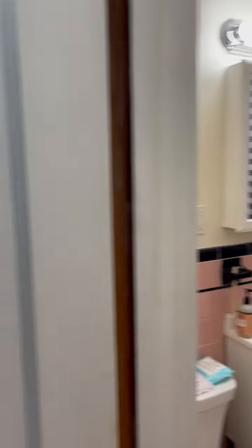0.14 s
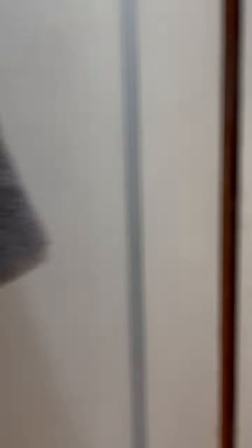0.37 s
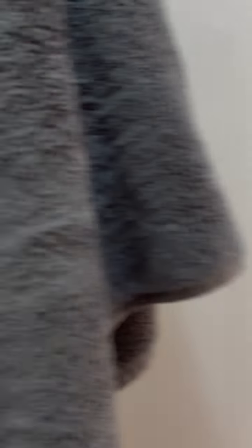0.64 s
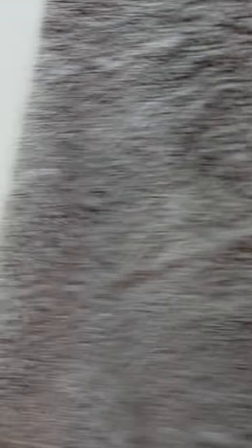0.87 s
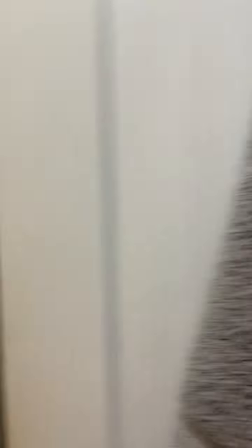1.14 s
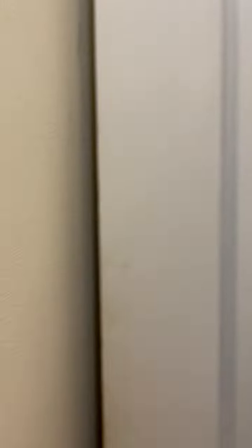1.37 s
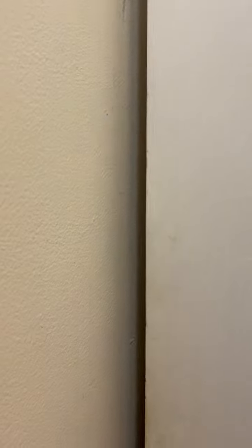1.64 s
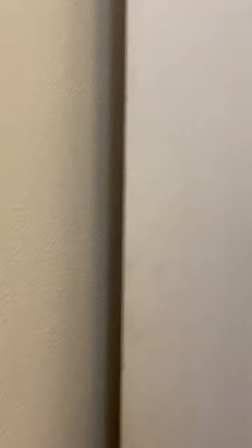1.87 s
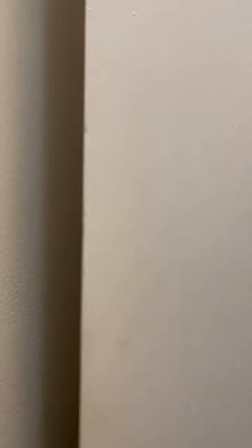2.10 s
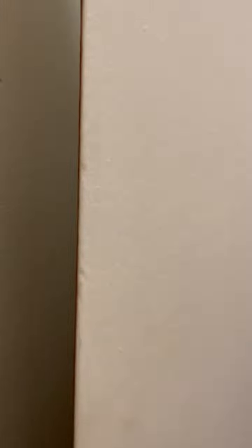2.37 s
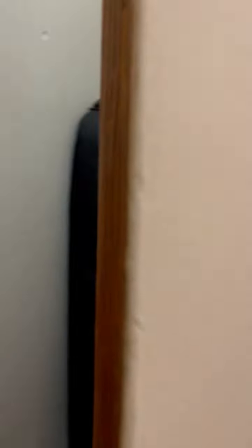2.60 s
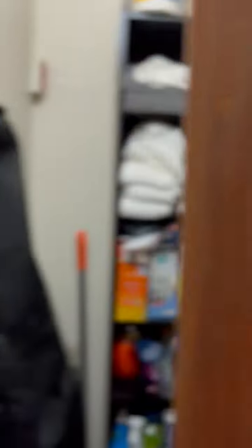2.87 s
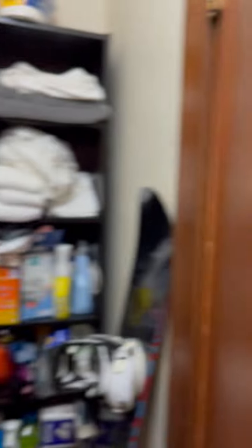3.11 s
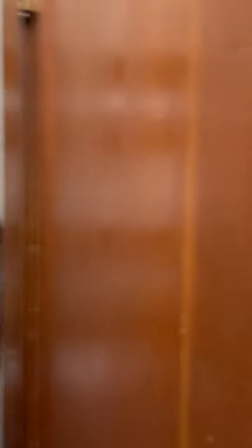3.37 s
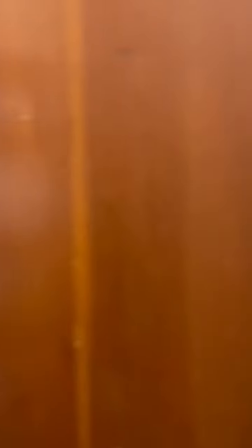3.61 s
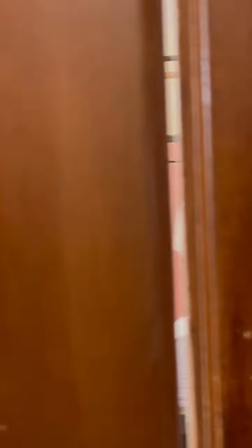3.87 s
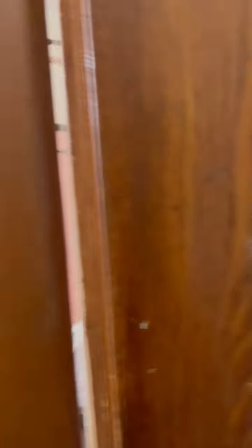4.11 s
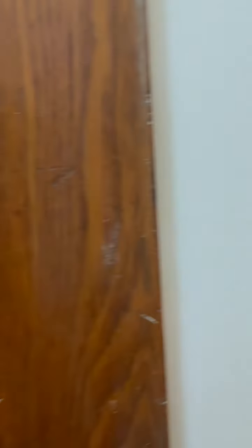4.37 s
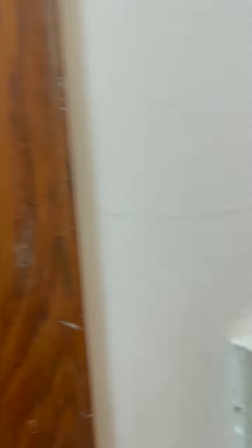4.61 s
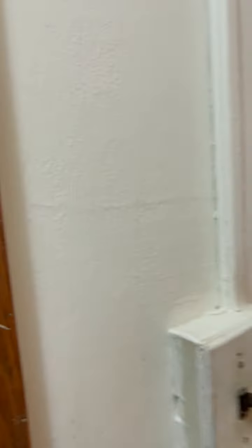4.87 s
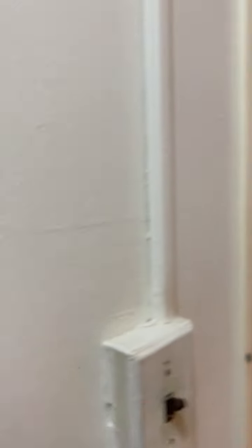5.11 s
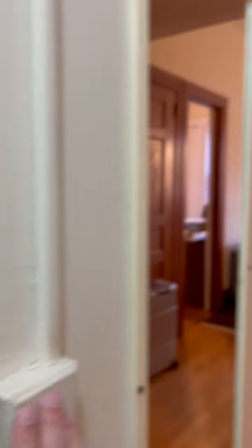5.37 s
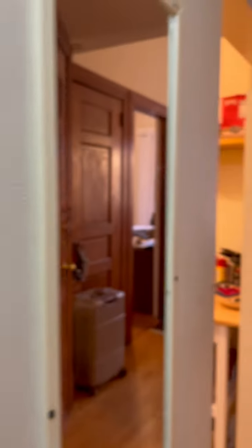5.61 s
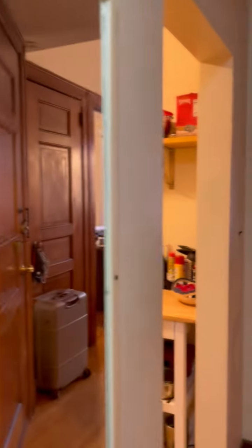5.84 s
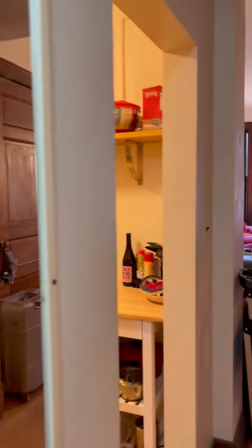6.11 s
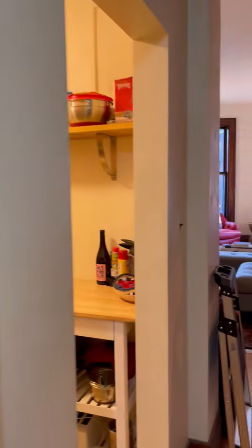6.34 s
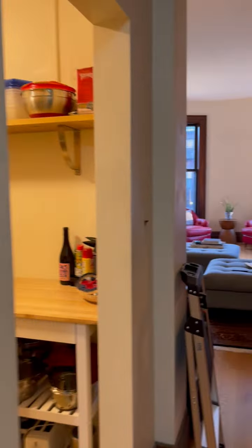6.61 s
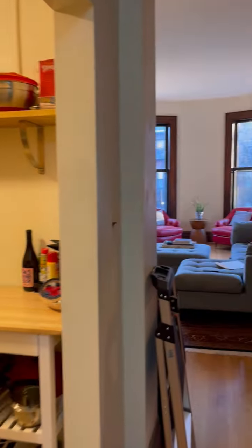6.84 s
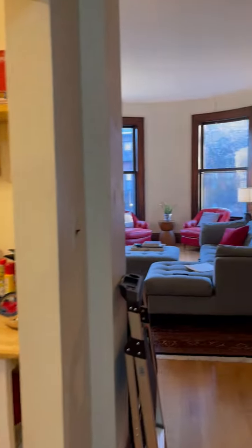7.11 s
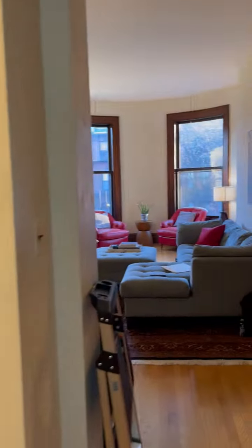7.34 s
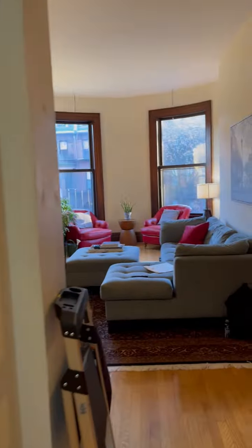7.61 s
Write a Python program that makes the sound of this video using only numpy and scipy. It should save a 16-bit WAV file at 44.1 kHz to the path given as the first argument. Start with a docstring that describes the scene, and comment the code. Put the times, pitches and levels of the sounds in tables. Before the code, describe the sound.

A quiet flat, heard from a handheld stereo microphone moving with the person: faint low hum, soft room air, bright cloth rustle. Muffled floor thumps come around 0.5 s. From 1.3 to 1.8 s a low drag on wood, a sleeve brush and firmer board knocks; another dry woody knock at 3.0 s, soft thuds at 3.4 and 3.8. Around 3.9-4.1 s a sleeve swishes and the handle turns with slight grit. At 4.48 s the steel latch snaps sharply; the wooden leaf thuds at 4.65, and at 4.72 comes the loudest, bright metallic crack with a deep wooden slam. It rebounds, chattering and rattling until about 5.1 s, with a short hallway echo. A small light switch clicks rapidly at 5.6 s. Clothing rustles around 6.0-6.4 s, then calm, with short woody floorboard cracks at 7.2 and 7.6 s.

```python
"""Pulling a wooden door shut

Someone walks through a quiet flat holding a phone: floorboards knock and crack, clothes rustle, a low hum goes on.
The handle turns, the latch strikes its plate, the leaf slams into the frame, rebounds and shudders; a switch clicks.
Struck things are sums of dying tones plus bursts of noise; cloth, air and rumble are coloured, moving noise.
Footsteps, door and switch also echo in a hallway of dying noise.
"""
import sys
import numpy as np
from scipy import signal
from scipy.fft import rfft, irfft, next_fast_len
from scipy.io import wavfile
from scipy.ndimage import uniform_filter1d, map_coordinates

SR = 44100
rng = np.random.default_rng(int(sys.argv[2]) if len(sys.argv) > 2 else 0)


def digitize_waveform(pressure):
    """Quantize a signal to 16-bit integers and store it at the path in sys.argv[1].

    Rows of a 2-D input are taken as channels; values are limited to [-1, 1].
    """
    field = np.atleast_2d(pressure).T
    bounded = np.clip(field, -1, 1)
    quanta = np.round(bounded * 32767).astype(np.int16)
    wavfile.write(sys.argv[1], SR, quanta)


def level_to_linear(level):
    """Convert decibel levels to linear amplitude factors, elementwise."""
    exponent = np.asarray(level, float) / 20
    return 10 ** exponent


N = 340726  # length of the scene in samples

# low sound of moving about: (time [s], floor rumble level [dB], room tone level [dB])
MOVING_LEVELS = [(0, -65, -60), (.58, -53, -62), (1.18, -60, -56), (1.52, -43, -50), (1.72, -36, -54),
                 (1.85, -67, -59), (2.25, -54.5, -52.5), (2.71, -59, -59.5), (3.03, -53, -48.5),
                 (3.27, -57, -62.5), (4.17, -49, -53.5), (4.56, -46.5, -50.5), (4.66, -45, -32),
                 (5.14, -46, -47.5), (5.42, -50, -66), (5.57, -47, -60), (5.88, -53.5, -62.5),
                 (6.7, -56, -63), (6.99, -54.5, -56), (7.32, -57, -63), (7.73, -53, -59)]
# cloth brushing cloth: (time [s], hiss level [dB], body level [dB])
CLOTH_LEVELS = [(0, -53.5, -56), (.6, -56, -57.5), (1.2, -55.5, -59.5), (1.4, -51, -59), (1.57, -42, -63),
                (1.83, -53.5, -60.5), (2.2, -49, -56), (2.4, -49, -60.5), (2.71, -58, -58.5),
                (3.2, -65.5, -65.5), (3.39, -54.5, -66.5), (3.55, -61.5, -65), (3.75, -53, -69),
                (4.0, -46, -57), (4.17, -51.5, -66.5), (4.56, -54.5, -52), (4.75, -49.5, -47),
                (5.1, -56.5, -59), (5.2, -46.5, -61), (5.38, -48.5, -64), (5.57, -61.5, -80),
                (5.88, -56, -58), (6.02, -44, -54), (6.14, -46, -55), (6.25, -46, -57), (6.38, -51.5, -57),
                (6.45, -56.5, -63), (6.71, -58, -65), (6.99, -52.5, -57.5), (7.32, -60, -64.5),
                (7.73, -61.5, -72)]
# colour of the floor rumble: (frequency [Hz], relative level [dB])
RUMBLE_COLOUR = [(15, -25), (30, -8.5), (55, 1.5), (85, -7), (130, -21.5), (250, -52)]
# colour of the cloth's bright hiss: (frequency [Hz], relative level [dB])
CLOTH_HISS_COLOUR = [(2500, -10), (4000, -4), (6500, -3.5), (8500, 0.5), (10500, 5.5), (11500, -1),
                     (12200, -18), (12800, -50.5), (14500, -63)]
# colour of the cloth's fuller body: (frequency [Hz], relative level [dB])
CLOTH_BODY_COLOUR = [(500, -0.5), (1200, -2), (2300, 0.5), (4500, -5.5), (7000, -37), (10000, -35.5),
                     (12000, -84)]
# colour of the still air: (frequency [Hz], relative level [dB])
AIR_COLOUR = [(150, -10), (400, 3.5), (1000, -2.5), (2000, -10.5), (4000, -12.5), (8000, -83)]
# air resonances of the rooms: (frequency [Hz], width [Hz], relative level [dB])
ROOM_MODES = [(110, 19.4, 1.5), (160, 29, -2.5), (205.8, 13, 1), (290, 15, -14), (373, 2.4, -18.5),
              (509, 66, -11.5)]

# steady hum of the building, one entry a tone: (frequency [Hz])
HUM_TONES = [59.4, 113, 210, 285, 319, 386]
# the hum, louder or fainter from spot to spot: (time [s], then the level of each tone [dB])
HUM_LEVELS = [(0, -53.5, -62, -70, -78, -65.5, -74), (.7, -56, -69, -66.5, -85, -67.5, -62),
              (1.2, -54, -61, -70, -80, -78, -80), (2.2, -54.5, -55, -60, -62.5, -80, -70),
              (2.8, -59, -63, -59, -62.5, -71, -68.5), (3.5, -62, -61, -76, -67, -68, -71),
              (4.3, -62.5, -68, -66.5, -67.5, -69, -83.5), (5.6, -61, -56, -72, -79.5, -83, -85.5),
              (6.6, -66, -64, -78, -86, -107, -101), (7.73, -55.5, -69, -73.5, -78, -80, -76)]

# short pings and squeaks: (time [s], level before flutter [dB], frequency [Hz], length [s])
PING_EVENTS = [(0.138, -50, 1080, 0.043), (0.13, -54.5, 710, 0.024), (0.211, -52.5, 880, 0.039),
               (3.61, -54, 883, 0.033), (3.84, -59, 2800, 0.073), (4.038, -52, 2200, 0.052),
               (4.038, -55, 3400, 0.025), (4.04, -54, 3600, .035), (4.479, -19.5, 4900, 0.012),
               (5.595, -61, 1205, 0.013), (5.59, -63, 1675, 0.022), (5.395, -51, 764, 0.021),
               (5.92, -49, 496, 0.038), (7.469, -54, 950, 0.018)]
PING_FLUTTER_DB, PING_SWAY_RAD = 3, .7  # how far level and phase waver

# floorboards under a foot:
# (time [s], thump level [dB], board frequency [Hz], time to fall 60 dB [s], crack over the thump [dB])
STEP_EVENTS = [(.446, -35, 69.5, 0.28, -40), (0.615, -38.5, 62, .2, -40), (1.337, -36, 185.7, 0.22, -6),
               (1.5, -38.5, 193, .2, -7), (1.623, -33.5, 200, 0.11, -5), (1.647, -27.5, 186.6, 0.18, -33),
               (1.655, -28.5, 62, 0.19, -36), (1.792, -34, 49.4, 0.25, -32), (2.627, -46, 127, .2, -7),
               (2.663, -41.5, 124, 0.16, -4), (2.986, -27.5, 207, 0.11, -8.5), (3.021, -43, 200, .12, -4),
               (3.041, -42, 200, 0.089, -15), (3.055, -41.5, 233, 0.11, -4), (3.414, -36, 48, .2, -40),
               (3.772, -31.5, 66.4, .2, -38), (6.438, -45, 68.5, 0.23, -35), (6.753, -38.5, 93, .2, -3),
               (7.205, -40.5, 166, 0.037, 12), (7.209, -27, 163, 0.084, 2.5), (7.231, -25, 165, .06, -10),
               (7.247, -40, 230, .2, -7), (7.465, -51, 116, .2, 3), (7.557, -31, 160, 0.12, -7),
               (7.582, -36.5, 260, .15, -13.5), (7.658, -36, 155, 0.19, -2.5), (7.686, -35, 290, 0.16, -22)]
# colour of a board's crack: (frequency [Hz], relative level [dB])
BOARD_COLOUR = [(100, 21), (200, 28), (600, 7), (1200, 1), (2500, 2), (4000, -32), (7000, -35.5),
                (12000, -39)]
# colour of a knocking wood joint: (frequency [Hz], relative level [dB])
JOINT_COLOUR = [(200, 4), (600, 9.5), (1100, 3), (2500, -13.5), (4000, -16), (7000, -23), (12000, -45),
                (13500, -60)]
# dry woody knocks, perhaps a hand or the door bumping: (time [s], crack level [dB], panel level [dB])
KNOCK_EVENTS = [(1.6155, -39.5, -43), (1.622, -54, -34), (2.983, -53, -37), (2.989, -51, -52),
                (2.996, -52, -60), (3.003, -50, -58), (3.013, -52, -58)]
# colour of a dry knock's crack: (frequency [Hz], relative level [dB])
KNOCK_COLOUR = [(200, -18), (800, -14), (1700, -2), (3000, -5), (4500, -14), (8000, -9), (12500, -40)]
# a thin panel under the dry knocks: (frequency [Hz], relative level [dB], time to fall 60 dB [s])
PANEL_MODES = [(423, -5, 0.037), (610, 3.5, 0.032), (870, -1, 0.047), (1047, -12, .05), (1254, -9, 0.057),
               (1590, -6, 0.037)]

# the hallway's echo: (frequency [Hz], time to fall 60 dB [s])
HALL_DECAY = [(60, 0.41), (300, 0.3), (1500, 0.26), (5000, 0.21), (11000, 0.095)]
# how alike left and right are in spread-out sound: (frequency [Hz], likeness [0 to 1])
SIDE_LIKENESS = [(150, 1), (400, .93), (750, .62), (1400, .85), (1950, .99), (3000, .55), (3900, .3),
                 (4900, .9), (5400, .7), (6100, .995), (7500, .9), (8800, .998), (9400, .998), (10500, .93),
                 (11800, .998), (13000, 1)]

# something drags low on wood: (time [s], length [s], level [dB])
DRAG_EVENTS = [(1.33, 0.16, -45), (1.49, .11, -39.5)]
# what it drags on: (frequency [Hz], width [Hz], relative level [dB])
DRAG_MODES = [(57.7, 14, 6), (181, 22, 5), (274, 26, -20), (430, 80, -23)]
# brief brushes of a sleeve: (time [s], length [s], level [dB])
SLEEVE_EVENTS = [(1.37, 0.3, -43.5), (3.95, .05, -46.5), (4.02, 0.11, -45.5), (5.465, 0.085, -49.5),
                 (7.392, 0.1, -46.5)]
# turns of the handle: (time [s], length [s], level [dB])
HANDLE_EVENTS = [(3.87, 0.17, -60), (4.035, 0.053, -47)]
# gritty colour of the turning handle: (frequency [Hz], relative level [dB])
HANDLE_COLOUR = [(1000, -9.5), (1900, -11), (2300, -5), (2800, -6), (3300, -4), (3900, -8), (5000, -28)]

# the leaf's ringing tones: (frequency [Hz], relative level [dB], time to fall 60 dB [s])
LEAF_MODES = [(108, -2.5, 0.14), (127, 10, 0.057), (158.3, -1, 0.11), (200, -4.5, 0.091), (228.4, -6, 0.32),
              (254.1, -4, 0.35), (310.7, -2.5, 0.22), (359, -27, 0.13), (422.7, -1, 0.23), (478, -7, 0.15),
              (606, -2.5, 0.11), (810, -11, 0.17), (1098, -4.5, 0.044), (1300, -10, .06)]
# the leaf's dense small tones, heard as a thump: (frequency [Hz], relative level [dB])
THUMP_COLOUR = [(40, -29), (120, -8), (300, -7), (600, -3), (1200, -12), (2500, -31), (5000, -58)]
# the door frame: (frequency [Hz], relative level [dB], time to fall 60 dB [s])
FRAME_MODES = [(44.5, 3, 0.51), (62, -8.5, 0.38), (83.7, 2.5, 0.3)]
# the partition wall: (frequency [Hz], relative level [dB], time to fall 60 dB [s])
WALL_MODES = [(26.4, 4.5, 0.71), (75.64, 2.5, 0.73)]
# wood on wood, the leaf meets the frame:
# (time [s], leaf level [dB], frame level [dB], wall level [dB], contact time [ms])
SINGLE_BLOWS = [(4.504, -36, -28.5, -40.5, 0.2), (4.525, -34, -27.5, -52.5, 0.21),
                (4.575, -42, -19, -43, 3.5), (4.652, -14.5, -10, -37, 4.2), (4.679, -26, -21, -18.5, 2.8),
                (4.7229, -11.5, -24, -23, 0.08), (4.738, -23, -13, -20.5, 1.3),
                (4.79, -28, -29.5, -23.5, 2.1), (4.85, -21, -31, -34, 2.1), (4.9, -23, -34, -30, 2.1),
                (4.936, -15, -16.5, -17, 3.5), (5.02, -21.5, -36, -26, 1.5), (5.041, -55, -31, -14, 1.3),
                (5.07, -29.5, -37, -35, 1.6), (5.39, -40.5, -56, -40, 2.1)]
# the rebound chatters: first touch, gap between touches, (leaf, frame, wall) levels, loss a touch, contact time
CHATTER_S, CHATTER_GAP_S, CHATTER_DB, CHATTER_LOSS_DB, CHATTER_MS = 4.96, .0175, (-18, -41, -16.5), 0.2, 1.87
SHAKE_DB, SHAKE_T60_S = -9, 0.38  # the leaf shakes on after a blow: level over the blow, time to fall 60 dB
# the loose rattle in the frame: (time [s], level [dB])
RATTLE_LEVELS = [(4.47, -69), (4.56, -60), (4.62, -55), (4.66, -52), (4.7, -47), (4.72, -35.5),
                 (4.88, -38.5), (5.0, -32), (5.04, -43.5), (5.12, -48), (5.37, -68)]
# colour of the rattle: (frequency [Hz], relative level [dB])
RATTLE_COLOUR = [(120, -57), (200, 2), (300, -3), (600, -17), (908, -18), (2550, -30), (8000, -44),
                 (10400, -77.5), (17600, -120)]

# steel on steel, the latch meets the plate, rides over it and drops in:
# (time [s], level [dB], contact time [ms], how freely it rings [dB])
LATCH_STRIKES = [(4.4777, -26.5, 0.061, -11), (4.4865, -22.5, 0.064, -9), (4.491, -6, 0.22, -1),
                 (4.495, -11.5, 0.42, -1), (4.5, -13.5, 0.75, -0.5), (4.504, -13.5, 0.23, -6.5),
                 (4.512, -21, .3, -3), (4.7, -38.5, 1, -4), (4.705, -34, 0.87, 1), (4.71, -26.5, 0.77, 6),
                 (4.7196, 1.5, 0.55, -10), (4.722, -2.5, 0.44, -11.5), (4.728, -13.5, 0.066, -14.5),
                 (4.738, -15, 0.75, -2), (4.749, -24, .8, -6), (4.938, -41, .8, -12), (4.961, -27, .9, -9),
                 (4.994, -34, .9, -12), (5.021, -34, 1.1, -6)]
# the latch's steel: (frequency [Hz], relative level [dB], time to fall 60 dB [s])
STEEL_MODES = [(1398, -2, 0.055), (1540, -1.5, 0.027), (1741, -2.5, 0.033), (2004, -4.5, 0.032),
               (2220, -8, 0.018), (2660, -5.5, 0.0096), (3110, 10, 0.024), (3240, 6, 0.013),
               (3464, 10.5, 0.022), (4600, -1.5, 0.02), (5500, -9, .015), (6230, 12, 0.013),
               (7200, -5.5, 0.015)]
# colour of a sharp strike: (frequency [Hz], relative level [dB])
CRACK_COLOUR = [(200, -15.5), (800, -21.5), (1700, -6.5), (2500, -7), (3400, -18.5), (4300, -7.5),
                (6000, -7), (8000, -5), (11000, -1), (12500, -30.5), (14500, -65)]
LATCH_KNOCK_DB = -27.5  # how much of a latch strike reaches the leaf
CRACK_T60_S = .023  # time the sharp part of a latch strike takes to fall 60 dB
STEEL_SCATTER_DB, LEAF_SCATTER_DB = 2, 2  # how much a tone's level differs from strike to strike
GRAIN_DB, GRAINS_PER_S = 3, 400  # how unevenly, and how finely, a burst crackles

# a light switch, a faint touch, then a quick run of four clicks: (time [s], click level [dB], box level [dB])
SWITCH_EVENTS = [(5.581, -48.5, -75), (5.6361, -34.5, -37.5), (5.64, -40, -37), (5.65, -43, -41),
                 (5.661, -52, -36.5)]
# the toggle: (frequency [Hz], relative level [dB], time to fall 60 dB [s])
TOGGLE_MODES = [(2200, 2, 0.049), (2990, 9.5, 0.013), (3570, 13, 0.012), (4170, 16.5, 0.0092),
                (5600, -2, .012), (6500, -8, .01)]
# the hollow switch box: (frequency [Hz], relative level [dB], time to fall 60 dB [s])
BOX_MODES = [(149, -12, 0.28), (226, -12.5, 0.19), (350, -1, 0.33), (533, -2, 0.038), (612, -12, 0.1),
             (850, -19, 0.087)]

# the phone's stereo beam, how far left leads right: (frequency [Hz], phase [rad])
LEFT_LEAD = [(150, 0), (700, -.5), (1100, -.45), (1500, -.35), (1900, 0), (3100, .45), (3550, .3),
             (4000, 1.1), (4650, 2.2), (4880, 3.14), (5170, 4.7), (5750, 6.25), (6200, 6.4), (7060, 7.5),
             (7900, 8.4), (8700, 9.3), (9450, 9.55), (10000, 10.1), (11000, 11.2), (11500, 12.2),
             (11900, 12.5), (12300, 12.57)]
# how much louder left is than right: (frequency [Hz], difference [dB])
LEFT_OVER_RIGHT = [(100, .3), (300, 2), (550, 1.2), (1100, 0)]
# the microphone's upper edge: (frequency [Hz], level [dB])
MIC_TOP = [(13500, 0.5), (14600, -34), (15300, -64.5)]
MIC_LOW_HZ = 24.2  # the microphone loses what lies below


def unit(x):
    """Scales a sound to an rms (average strength) of 1."""
    return x / np.sqrt(np.mean(x ** 2) + 1e-20)


def along(points, hz):
    """Reads a table of (frequency, value) points, joined by straight lines on a log frequency axis."""
    f, v = np.transpose(points)
    return np.interp(np.log(hz + 1), np.log(f + 1), v)


def curves(rows):
    """Joins the points of each column after the time by straight lines, one value per sample."""
    s, *cols = np.transpose(rows)
    return [np.interp(np.arange(N) / SR, s, c) for c in cols]


def wobble(rate):
    """Draws a smooth random curve with that many random points a second."""
    points = rng.standard_normal(int(N * rate / SR) + 4)
    return map_coordinates(points, [np.arange(N) * rate / SR])


def filtered(x, response):
    """Multiplies the spectrum of x by a response that depends on frequency."""
    m = next_fast_len(x.shape[-1] + 8192)  # room for the filter's tail
    spectrum = rfft(x, m) * response(np.fft.rfftfreq(m, 1 / SR))
    return irfft(spectrum, m)[..., :x.shape[-1]]


def widened(pair, spectrum):
    """Colours two unrelated signals and blends them until left and right are as alike as the table says."""
    def blend(hz):
        turn = np.arccos(np.clip(along(SIDE_LIKENESS, hz), 0, 1)) / 2
        return level_to_linear(along(spectrum, hz)) * [np.cos(turn), np.sin(turn)]

    mid, side = filtered(pair, blend)
    return np.array([mid + side, mid - side])


def rush(spectrum, patchy_db=2.0):
    """Makes spread-out stereo noise of rms 1, its level randomly varied over time and frequency."""
    z = signal.stft(rng.standard_normal((2, N)), nperseg=512)[2]
    variation = uniform_filter1d(rng.standard_normal(z.shape[1:]), size=6, axis=0)
    variation = uniform_filter1d(variation, size=16, axis=1)
    pair = signal.istft(z * level_to_linear(patchy_db * unit(variation)), nperseg=512)[1][:, :N]
    return unit(widened(pair, spectrum))


def resonant(modes):
    """Makes steady noise of rms 1 through (frequency, width, level) resonances, with the treble softened."""
    def bank(f):
        return sum(level_to_linear(db) * 1j * f * w / (c * c - f * f + 1j * f * w) for c, w, db in modes)

    noise = filtered(rng.standard_normal(N), bank)
    return unit(filtered(noise, lambda f: 1 / (1 + f / 150)))


def add(track, s, sound):
    """Mixes a sound into the track at a time in seconds."""
    part = track[round(s * SR):][:len(sound)]
    part += sound[:len(part)]


def ring(modes, t, contact_ms, scatter_db):
    """Strikes tones once; a longer contact makes them rise slower and weakens the high ones."""
    hz, db, t60 = np.transpose(modes)[:, :, None]
    sign = (-1) ** np.arange(len(hz))[:, None]  # neighbours in opposite phase
    soft = sign / (1 + (hz * contact_ms / 300) ** 2)
    level = level_to_linear(db + scatter_db * rng.standard_normal(hz.shape) - 60 * t / t60)
    tones = (soft * level * np.sin(2 * np.pi * hz * t)).sum(0)
    return tones * (1 - np.exp(-1000 * t / contact_ms))


def burst(spectrum, t, t60):
    """Makes coloured, grainy noise that dies away unevenly."""
    grain = level_to_linear(GRAIN_DB * np.interp(t * GRAINS_PER_S, np.arange(400), rng.standard_normal(400)))
    noise = filtered(rng.standard_normal(len(t)), lambda hz: level_to_linear(along(spectrum, hz)))
    return unit(grain * noise) * level_to_linear(-60 * t / t60)


def walking():
    """Floor rumble, cloth brushing cloth and the air of the rooms: noises that swell and fade."""
    (rumble_db, tone_db), (hiss_db, body_db) = curves(MOVING_LEVELS), curves(CLOTH_LEVELS)
    rumble = level_to_linear(rumble_db + 2.2 * wobble(12)) * rush(RUMBLE_COLOUR, patchy_db=1.0)
    crumple_db = 0.5 * wobble(30) + 0.2 * wobble(120)  # fibres catch unevenly
    hiss = level_to_linear(hiss_db + crumple_db) * rush(CLOTH_HISS_COLOUR)
    body = level_to_linear(body_db + crumple_db) * rush(CLOTH_BODY_COLOUR)
    tone = level_to_linear(tone_db + 0.58 * wobble(3.936)) * resonant(ROOM_MODES)
    air = level_to_linear(-65.0 + 2.96 * wobble(2.713)) * rush(AIR_COLOUR)
    return rumble + hiss + body + tone + air


def hum():
    """The building's hum: pure tones, slightly unsteady in level and phase."""
    t = np.arange(N) / SR
    out = np.zeros(N)
    for hz, db in zip(HUM_TONES, curves(HUM_LEVELS)):
        out += level_to_linear(db + 0.91 * wobble(8.4)) * np.sin(2 * np.pi * hz * t + 1.34 * wobble(4))
    return out


def pings():
    """Brief blurred tones whose phase and level waver."""
    out = np.zeros(N)
    for s, db, hz, length in PING_EVENTS:
        t = np.arange(round(length * SR)) / SR
        sway, flutter = (np.interp(t / length * 4, np.arange(5), row) for row in rng.standard_normal((2, 5)))
        tone = np.sin(2 * np.pi * hz * t + PING_SWAY_RAD * sway)
        swell = np.sin(np.pi * t / length)
        add(out, s, level_to_linear(db + PING_FLUTTER_DB * flutter) * swell * tone)
    return out


def steps():
    """A board thumps at its own pitch, drums a little and cracks at the joint; dry woody knocks ring a panel."""
    out, t = np.zeros(N), np.arange(SR // 3) / SR
    for s, db, hz, t60, crack_db in STEP_EVENTS:
        thump = ring([(hz, 0, t60), (1.92 * hz, -9, 0.29 * t60)], t, 0.96, 1.6)
        crack = 0.44 * burst(JOINT_COLOUR, t, 0.064) + .5 * burst(BOARD_COLOUR, t, 0.081)
        crack *= 1 - np.exp(-t / 0.00054)  # a sole lands softly
        add(out, s, level_to_linear(db) * (thump + level_to_linear(crack_db) * crack))
    for s, db, panel_db in KNOCK_EVENTS:
        knock = level_to_linear(db) * burst(KNOCK_COLOUR, t, 0.029)
        add(out, s, knock + level_to_linear(panel_db) * ring(PANEL_MODES, t, 0.25, 0.88))
    return out


def hall(x, count=4):
    """The hallway's echo: noise whose frequencies die at their own speeds."""
    turn = np.arange(N) // 8192 % count  # the code takes turns among the drawn tails
    out = np.zeros((2, N))
    for k in range(count):
        hz, t, z = signal.stft(rng.standard_normal((2, SR // 2)), SR, nperseg=256)
        fade = level_to_linear(-60 * t / along(HALL_DECAY, hz)[:, None])
        tail = signal.istft(z * fade, SR, nperseg=256)[1]
        tail = widened(tail, [(60, -13.5), (300, -5.0), (700, -8.5), (8000, -1.5)])
        tail = tail / np.linalg.norm(tail[0])
        share = uniform_filter1d((turn == k) * 1.0, size=2048)  # blend from one tail to the next
        late = np.pad(x * share, (200, 0))  # the echo starts 200 samples late
        out += signal.fftconvolve(late[None], tail, axes=1)[:, :N]
    return filtered(out, lambda hz: hz < 14500)


def swells(rows):
    """Draws a loudness curve of short rounded swells from (time, length, level) rows, with a slight waver."""
    out = np.zeros(N)
    for s, length, db in rows:
        t = np.arange(round(length * SR)) / SR
        add(out, s, level_to_linear(db) * np.sin(np.pi * t / length) ** 0.45)
    return out * level_to_linear(1.2 * wobble(60))


def brushes():
    """A low drag on wood, bright swishes of a sleeve and the gritty turn of the handle: noise in short swells."""
    sleeve = rush([(3000, -10.5), (6500, -3.5), (11000, 6.5), (12500, -12), (14500, -12)])
    drag = swells(DRAG_EVENTS) * resonant(DRAG_MODES)
    return drag + swells(SLEEVE_EVENTS) * sleeve + swells(HANDLE_EVENTS) * rush(HANDLE_COLOUR)


def blows():
    """Lists the single blows and the three touches of the rebound, each touch a little weaker."""
    touches = []
    for k in range(3):
        levels_db = np.subtract(CHATTER_DB, k * CHATTER_LOSS_DB)
        touches.append((CHATTER_S + k * CHATTER_GAP_S, *levels_db, CHATTER_MS))
    return SINGLE_BLOWS + touches


def shudder():
    """After each blow random pushes from the frame keep the leaf's tones going; something loose rattles."""
    power, t = np.zeros(N), np.arange(SR // 2) / SR
    for s, leaf_db, *_ in blows():
        fade = level_to_linear(leaf_db + SHAKE_DB - 60 * t / SHAKE_T60_S)
        add(power, s, fade ** 2 * (1 - np.exp(-t / 0.0075)))
    # a tone that dies faster becomes a wider resonance
    shaking = resonant([(hz, 2.6 / t60, db) for hz, db, t60 in LEAF_MODES])
    rattle_db, = curves(RATTLE_LEVELS)
    i = np.arange(N)
    going = (i > RATTLE_LEVELS[0][0] * SR) & (i < RATTLE_LEVELS[-1][0] * SR)
    rattle = going * level_to_linear(rattle_db + 4 * wobble(70)) * rush(RATTLE_COLOUR)
    return np.sqrt(power) * shaking + rattle


def leaf(t, contact_ms):
    """The leaf struck once: clear tones over a dull thump, duller for a longer contact."""
    thump = filtered(burst(THUMP_COLOUR, t, 0.11), lambda hz: 1 / (1 + (hz * contact_ms / 300) ** 2))
    rise = 1 - np.exp(-300 * t / contact_ms)
    return ring(LEAF_MODES, t, contact_ms, LEAF_SCATTER_DB) + 0.94 * thump * rise


def door():
    """The latch rings its steel with a crack of broad noise; each blow rings leaf, frame and wall."""
    out, t = np.zeros(N), np.arange(SR // 3) / SR
    for s, db, contact_ms, ring_db in LATCH_STRIKES:
        steel = 0.4 * level_to_linear(ring_db) * ring(STEEL_MODES, t, 0.067, STEEL_SCATTER_DB)
        steel += 1.09 * burst(CRACK_COLOUR, t, CRACK_T60_S)
        steel += 0.15 * burst(CRACK_COLOUR, t, 0.2)  # a fainter, longer tail
        steel = filtered(steel, lambda hz: 1 / (1 + (hz * contact_ms / 1500) ** 2))
        add(out, s, level_to_linear(db) * (steel + level_to_linear(LATCH_KNOCK_DB) * leaf(t, contact_ms)))
    t = np.arange(SR * 3 // 4) / SR
    for s, leaf_db, frame_db, wall_db, contact_ms in blows():
        frame = level_to_linear(frame_db) * ring(FRAME_MODES, t, 4.8, 2.3)
        wall = level_to_linear(wall_db) * ring(WALL_MODES, t, 3.48, 0.89)
        add(out, s, level_to_linear(leaf_db) * leaf(t, contact_ms) + frame + wall)
    return out


def switch():
    """The toggle clicks, ringing and cracking, and knocks its hollow box."""
    out, t = np.zeros(N), np.arange(SR // 4) / SR
    for s, click_db, box_db in SWITCH_EVENTS:
        click = 0.43 * ring(TOGGLE_MODES, t, 0.096, STEEL_SCATTER_DB)
        click += 0.64 * burst(CRACK_COLOUR, t, 0.042) * (1 - np.exp(-t / 0.001))
        box = ring(BOX_MODES, t, 0.63, 2.4) + 0.35 * burst(JOINT_COLOUR, t, 0.066)
        add(out, s, level_to_linear(click_db) * click + level_to_linear(box_db) * box)
    return out


def scene():
    """Mixes the struck things and their echoes over the moving floor of sound."""
    near, small = door() + switch(), steps()
    struck = near + level_to_linear(-9.0) * hall(near) + small + level_to_linear(-2.0) * hall(small)
    return struck + shudder() + walking() + brushes() + hum() + pings()


def top_cut(x):
    """Nothing passes above the cut-off."""
    return signal.sosfilt(signal.butter(12, 14930, fs=SR, output="sos"), x)


def record(dry):
    """The stereo beam turns the two sides apart in phase, loud peaks round off, the microphone trims both ends."""
    def half(hz):  # each side takes half of the difference
        return level_to_linear(along(LEFT_OVER_RIGHT, hz) / 2) * np.exp(1j * along(LEFT_LEAD, hz) / 2)

    def microphone(hz):
        return level_to_linear(along(MIC_TOP, hz)) * (1j * hz / (MIC_LOW_HZ + 1j * hz)) ** 2

    beamed = filtered(dry, lambda hz: np.array([half(hz), 1 / half(hz)]))
    rounded = beamed / (1 + np.abs(beamed / .97) ** 4) ** (1 / 4)
    mix = filtered(rounded, microphone)
    return top_cut(mix)


dry = scene()
out = record(dry)
digitize_waveform(out)
```